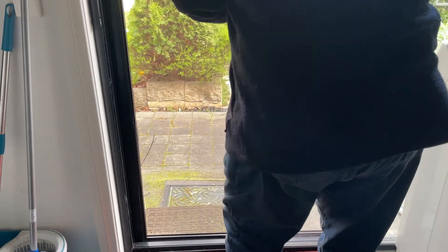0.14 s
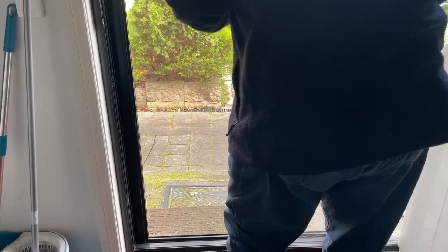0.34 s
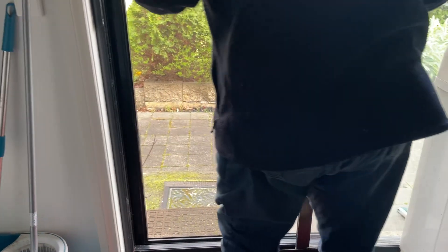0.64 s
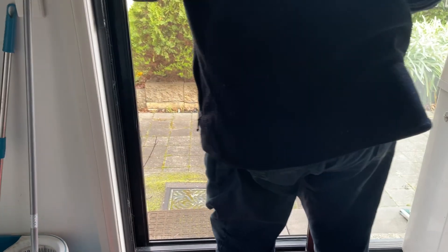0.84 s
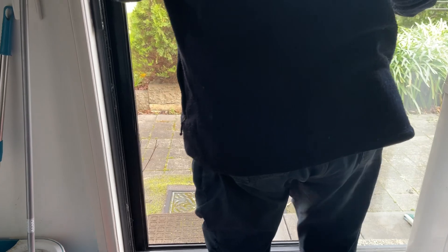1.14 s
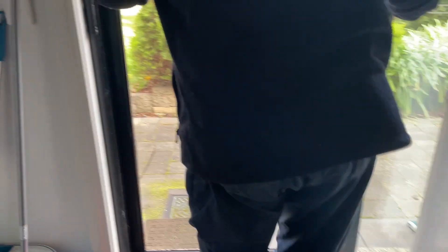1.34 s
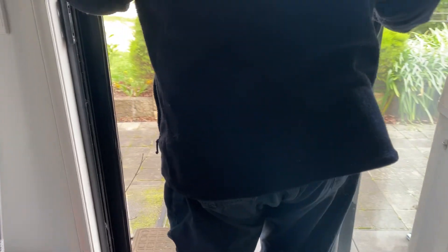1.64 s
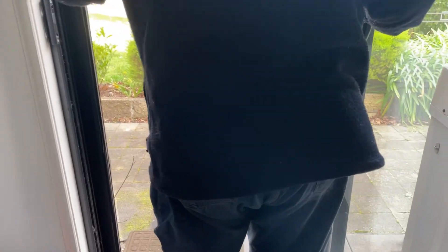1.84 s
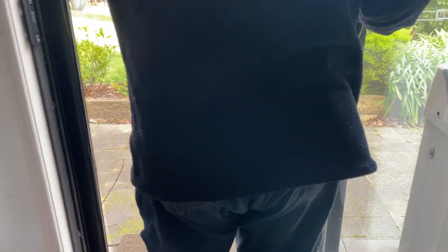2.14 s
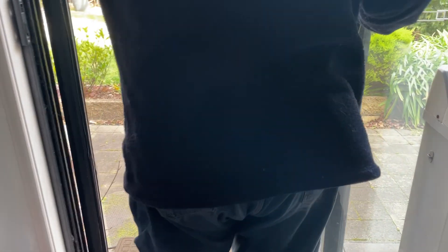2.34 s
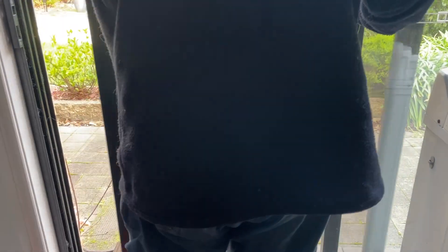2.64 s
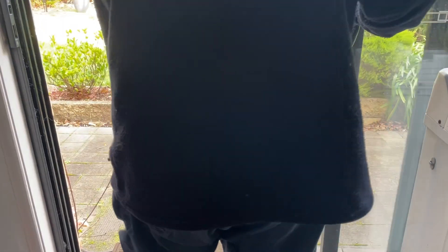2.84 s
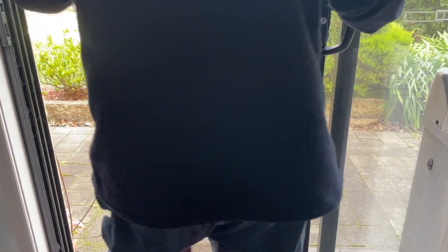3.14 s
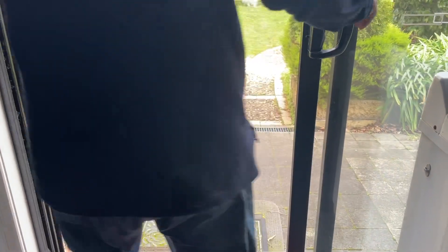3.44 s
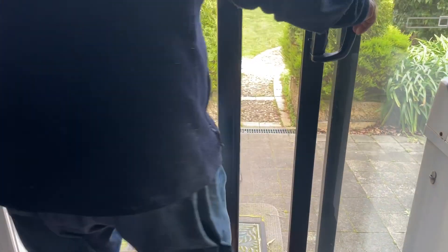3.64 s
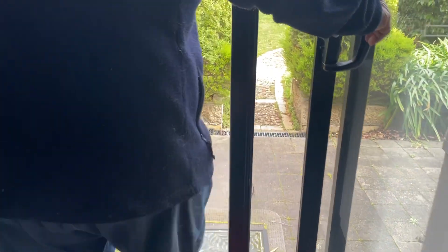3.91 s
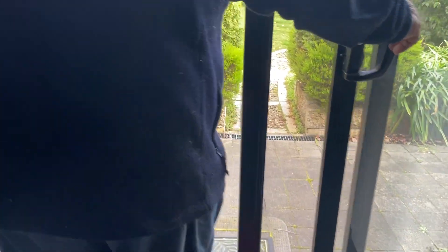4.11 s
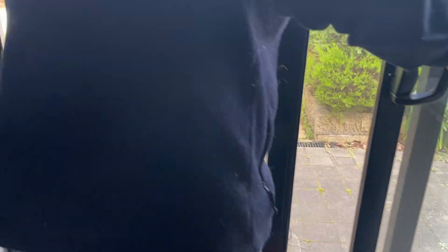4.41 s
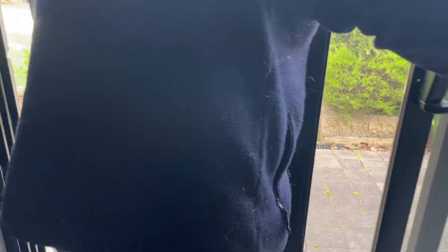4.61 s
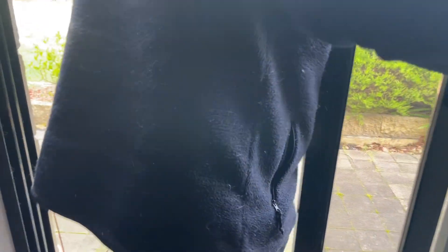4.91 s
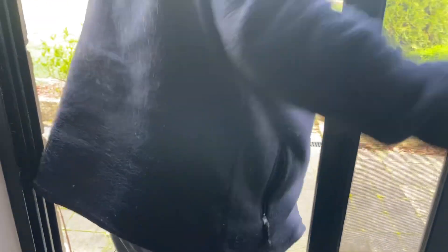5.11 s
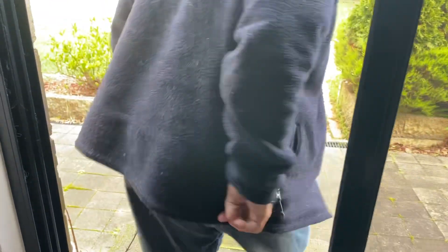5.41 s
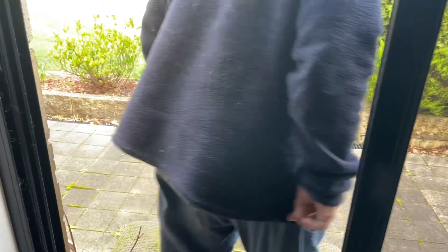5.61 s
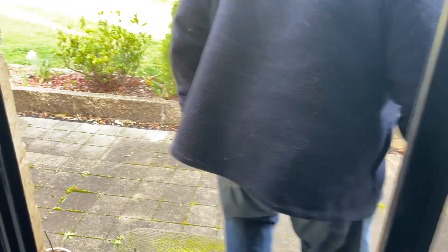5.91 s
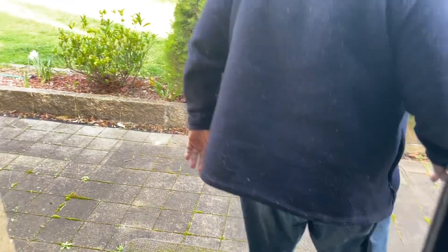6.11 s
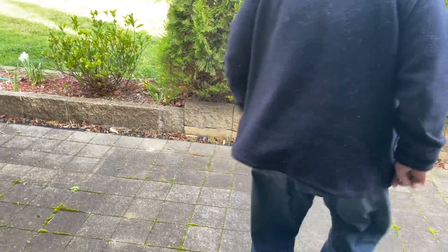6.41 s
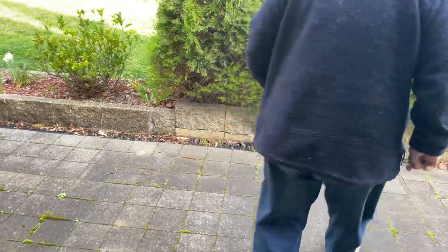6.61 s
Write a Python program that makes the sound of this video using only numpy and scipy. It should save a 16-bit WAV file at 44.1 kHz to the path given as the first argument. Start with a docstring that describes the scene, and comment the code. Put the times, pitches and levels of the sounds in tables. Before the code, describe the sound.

Heavy glass panels roll on a track: a first low rumble with clacks dies down, a brittle metallic clatter follows, then a stronger, longer rumble with scraping and rattling. After it stops, a person steps out, soles scuffing softly, heels striking the sill very sharply, then the doorstep and paving. Stereo phone pickup, short indoor reverberation thinning towards a quiet outdoor hiss.

```python
"""Small room at a garden doorway: two sliding glass doors a metre from a phone's two microphone ports.
Rollers bump and scrape along the tracks, as random grains ringing floor, panes, frame and rail.
Latch and frame clack as dying bursts; metal parts ping as wavering sines; a seal whines in narrow noise.
Then someone steps out: soles scuff as filtered hiss, heels ring sill, doorstep and paving as decaying modes.
House rumble and garden hiss are shaped noise; an octave-band noise tail answers for the room."""
import sys
import numpy as np
from scipy import signal
from scipy.fft import rfft, irfft, next_fast_len
from scipy.io import wavfile
from scipy.ndimage import uniform_filter1d

SR = 44100
rng = np.random.default_rng(int(sys.argv[2]) if len(sys.argv) > 2 else 0)


def master_out(mix):
    """Clip the mix to full scale and print it as 16-bit PCM to the path in sys.argv[1]."""
    frames = np.transpose(np.atleast_2d(mix))
    ceiling = np.clip(frames, -1, 1)
    pcm = np.round(ceiling * 32767).astype(np.int16)
    wavfile.write(sys.argv[1], SR, pcm)


N = 298116
T = np.arange(N) / SR
SIZE = next_fast_len(N + SR // 2)
HZ = np.maximum(np.arange(SIZE // 2 + 1) * SR / SIZE, 1)

# air spectrum, relative: [f/Hz, level/dB per Hz]
AIR_SPECTRUM = [(20, -23), (37, -7), (62, 3), (140, -2), (240, -6.5), (320, -12.5), (700, -16.5),
                (1200, -23.5), (1900, -27), (3000, -30), (5000, -48.5), (8500, -49.5), (10500, -57),
                (12500, -57), (16000, -68)]
# air over time: [t/s, house rumble level/dB, garden hiss level/dB]
AIR_LEVELS = [(0, -32.5, -91), (1.3, -56.5, -69), (1.75, -50, -66), (4.2, -56.5, -68), (4.46, -57.5, -68.5),
              (5.1, -53, -66.5), (5.7, -56, -64.5), (5.98, -52.5, -63), (6.35, -57.5, -66.5),
              (6.76, -50.5, -61.5)]
FLICKER_DB = 2.5  # depth scale of the slow walk in air and grit levels

# doors roll, shake and settle: [t/s, pane rumble level/dB, track grit level/dB above the rumble]
ROLL_LEVELS = [(0.0, -25.5, -26), (0.17, -31.5, -30), (0.3, -36.5, -24), (0.54, -38.5, -25.5),
               (0.62, -42.5, -21), (0.82, -45, -22.5), (1.0, -67, -3), (1.26, -52, -16.5),
               (1.42, -60.5, -11.5), (1.48, -38.5, -34), (1.603, -39, -9), (1.8, -51.5, -61),
               (1.9, -72, -4), (2.0, -53, -37), (2.131, -71, -12), (2.158, -36, -20), (2.35, -42.5, -15.5),
               (2.42, -32, -21), (2.6, -29, -21.5), (2.72, -31, -19.5), (2.83, -35.5, -11.5),
               (2.88, -28, -24.5), (2.98, -29, -23), (3.2, -34.5, -11), (3.45, -35, -17),
               (3.6, -43.5, -13.5), (3.75, -53, -17), (3.9, -54, -18), (3.98, -48, -12.5), (4.13, -57, -48),
               (4.2, -88, -38)]
# the two doors: [rolls until t/s, floor boom and frame drone level/dB above the rumble at median drive,
# then rail scrape, bright top and seal hiss level/dB above the grit]
DOORS = [(2.12, -7.5, -6, -0.75, -7, 3.5), (4.2, -4.5, -6, 1.8, -15.5, -1.5)]
# modes of each door's pane: [f/Hz, width f/Hz, level/dB]
PANE_MODES = [
    [(103, 24, -6.5), (162, 29, 1), (207, 12, 0.5), (235, 24, 0), (288.6, 27, -1.5), (342, 14.6, -4),
     (410, 62, -6.5), (549, 10.4, -8.5), (669, 31, -13.5)],
    [(83.3, 20.4, -1.5), (135.5, 41, 1), (170.8, 24, -2), (201.3, 34, -1.5), (252.5, 54, -5.5),
     (364, 58, -12), (457, 40, -7.5)],
]
# floor boom: [f/Hz, width f/Hz, level/dB]
FLOOR_MODES = [(36, 33, -36), (61.5, 3.3, 15)]
# door frame: [f/Hz, width f/Hz, level/dB]
FRAME_MODES = [(347, 104, 3.5), (450, 98, 3), (540.5, 30, 2.5), (636, 132, -4), (784, 186, -5.5),
               (872, 187, -8)]
# rail: [f/Hz, width f/Hz, level/dB]
RAIL_MODES = [(940, 300, 8), (1181, 46, 11), (1320, 50, 10), (1594, 310, 12), (2370, 220, -3)]
# track: [f/Hz, width f/Hz, level/dB]
TRACK_MODES = [(2300, 500, -3), (2850, 450, -2), (3420, 280, 4), (4250, 600, -3), (5300, 1400, -8)]
# broad hiss of the brush seal: [f/Hz, width f/Hz, level/dB]
SEAL_HISS = [(1050, 410, 0.5), (2380, 1900, -3), (4270, 1600, -6.5)]
BUMPS_PER_S, GRIT_PER_S = 500, 3000
FLOOR_PER_RUMBLE = -0.48  # dB of floor boom share per dB of rumble
FRAME_PER_GRIT = 0.26  # dB of frame drone per dB of grit
MODE_WANDER_DB, MODE_WANDERS_PER_S = 3.5, 12  # the pane favours now one mode, now another
PATCHY_DB, PATCHES_PER_S = 3, 45  # each scraped part catches and lets go by itself

# uneven spots jolt the pane: [t/s, level/dB before a fixed 3.5 dB lift, f/Hz, t60/s]
JOLTS = [(0.035, -22, 348, 0.15), (0.0, -37, 39.2, 0.31), (0.078, -28, 151.1, 0.46), (0.44, -40, 673, 0.37),
         (0.13, -28.5, 443, 0.1), (0.134, -48, 216, 0.098), (0.161, -28, 71.4, 0.32),
         (0.21, -31.5, 384.6, 0.22), (0.451, -29, 416, 0.073), (0.49, -26.5, 241, 0.22),
         (1.575, -27.5, 75.7, 0.17), (2.229, -29.5, 236.5, 0.14), (2.409, -35, 84.5, 0.22),
         (2.481, -25, 145, 0.17), (2.55, -23, 189, 0.18), (2.58, -25, 135.4, 0.34), (2.649, -30, 87, 0.23),
         (2.86, -30.5, 90, 0.23), (2.863, -25, 234, 0.11), (2.961, -30.5, 91.7, 0.4),
         (3.041, -37, 137, 0.12), (3.2, -34, 87, 0.35), (3.31, -31.5, 89.7, 0.31),
         (1.618, -29.5, 130, 0.27), (3.15, -25.5, 445.4, 0.33), (3.202, -23, 182, 0.1),
         (3.297, -27, 307, 0.025)]
JOLT_RISE_SHARE = 0.042  # rise time over t60

# latch and frame clacks: [t/s, track level/dB, then level/dB above it of rail, bright top and dull body,
# t60/s of the metal]
CLACKS = [(0.06, -34.5, -40, 0, 6, 0.062), (0.098, -40, 7.5, -25, 9, 0.098),
          (0.126, -45.5, 5.5, -35, 14.5, 0.22), (0.271, -50, -24.5, -6, 17, 0.18),
          (0.305, -37.5, 3.5, -45, 0.5, 0.16), (1.2816, -52, 0.5, -36, 9, 0.094),
          (1.294, -52.5, 6.5, -32, -0.5, 0.14), (1.4394, -43, 6, -2.5, -5, 0.12),
          (1.455, -46, -15, -12, 2, 0.075), (1.473, -34.5, -3, -7, -11, 0.11),
          (1.491, -47.5, 6, -27, 0, 0.1), (1.562, -38.5, -8, 4.5, -11, 0.073),
          (1.566, -35, 1.5, -1, -3.5, 0.13), (1.623, -47.5, 5.5, -21, 7, 0.14),
          (1.847, -44, 0, -45, -20, 0.15), (1.9478, -54, 5, -36, 3, 0.13),
          (2.0543, -41.5, -1, -7, -10, 0.13), (2.24, -44.5, 6, -30, 11, 0.041),
          (2.313, -59.5, 14.5, 8.5, 16.5, 0.5), (2.46, -44, 3.5, -36, 4.5, 0.11),
          (2.471, -43, 9, -45, 5, 0.2), (2.5716, -40, -27, -39, -24, 0.17),
          (2.5938, -38.5, 10, -35, 6.5, 0.09), (2.611, -36, 6.5, -30, 4, 0.2),
          (2.705, -38.5, 5, -32, -15, 0.19), (2.757, -41, -9, -11, -24, 0.21),
          (2.966, -42.5, 0, -11, 4.5, 0.44), (3.027, -40.5, 0.5, -32, -4, 0.2),
          (3.162, -34, -29, -33, -3, 0.21), (3.297, -36.5, -11, -37.5, -2.5, 0.18),
          (3.36, -50, -16, -33, 13.5, 0.14)]
CLACK_RISE_SHARE, CLACK_PAN_DB = 0.049, 4.5  # rise time over t60; left minus right

# small metal parts ping: [t/s, level/dB, f/Hz, t60/s]
PINGS = [(0.311, -36, 2810, 0.16), (0.315, -45, 1500, 0.13), (1.282, -45, 1940, 0.055),
         (1.442, -39.5, 1755, 0.31), (1.442, -41, 1910, 0.24), (2.713, -40, 1500, 0.076),
         (2.619, -33, 1248, 0.12), (1.453, -40, 2720, 0.056), (1.568, -26, 4240, 0.025),
         (1.566, -32.5, 1610, 0.048), (1.576, -30.5, 3280, 0.035), (1.624, -48, 3320, 0.1),
         (1.682, -51.5, 3290, 0.095), (1.854, -43.5, 951, 0.25), (1.946, -54.5, 5720, 0.17),
         (2.144, -41.5, 2157, 0.078)]
# a roller hits a dent in the track: [t/s, level/dB]
ROLLER_HITS = [(2.571, -31.5), (2.967, -29.5), (3.012, -32), (3.04, -32), (3.093, -30.5), (3.302, -30),
               (3.366, -30.5), (3.385, -32), (3.475, -36), (3.591, -40)]
# small cracks and taps under the soles: [t/s, level/dB, f/Hz, bright top level/dB above the pitch]
CRACKS = [(3.836, -45, 3180, -5), (4.591, -46, 667, -58), (5.536, -51, 1930, -7), (5.699, -54, 730, -33),
          (5.989, -52, 760, -45), (6.015, -48, 760, -48), (6.102, -51, 4700, -19), (6.118, -53, 1400, -40),
          (6.141, -36, 1660, -42), (6.142, -40, 3200, -31), (6.144, -33.5, 1700, -42),
          (6.165, -53, 2530, -7), (6.243, -57, 3850, -22), (6.552, -47, 3430, -16),
          (6.662, -39, 3460, -11.5), (6.739, -50, 2390, -17)]
ROLLER_HZ, ROLLER_SPREAD_HZ, ROLLER_T60_S = 3430, 107, 0.016
CRACK_T60_S = 0.026  # at 1 kHz; higher cracks die sooner, by the root of the pitch

# seal whine, each band filtered twice: [f/Hz, width f/Hz per pass, level/dB of the first pass]
WHINE_BANDS = [(1260, 80, 0), (4620, 220, -11), (6600, 260, -15), (7700, 260, -13)]
# seal whine over time, silent outside: [t/s, level/dB]
WHINE_LEVELS = [(3.5, -66), (3.63, -65.5), (3.79, -63), (3.83, -64), (3.9, -67)]

# soles and cloth dragging: [t/s, hiss level/dB before the drag envelope, dull rub level/dB above it,
# bright top level/dB above it, length scale/s]
SCUFFS = [(3.902, -51, 0.5, 3, 0.12), (4.448, -76.5, 22.4, 6, 0.1), (4.66, -55.5, 0.94, -7, 0.15),
          (4.727, -63, 15.5, 3.5, 0.15), (5.026, -37, 1.1, -23, 0.16), (6.09, -53, 4.5, -20, 0.17),
          (6.524, -53.5, 0.75, 7.5, 0.09), (6.6, -70, 17, -14, 0.19), (6.68, -69, 14, -12, 0.25)]

# footfalls: [t/s, what is trodden on, knock level/dB, contact time/s, left minus right level/dB]
STEPS = [(3.978, "ground", -37, 0.0035, 3), (4.619, "ground", -38, 0.0054, 2),
         (4.808, "ground", -43, 0.0068, 0), (5.05, "sill", -25, 0.00072, 6),
         (5.0642, "sill", -13, 0.00018, 5), (5.068, "sill", -16, 0.0012, 0),
         (5.0721, "sill", -18, 0.00043, -0.5), (5.092, "sill", -31.5, 0.00084, -2),
         (5.543, "ground", -35, 0.0039, 2), (5.7696, "doorstep", -15, 0.00053, 3.5),
         (6.079, "ground", -24.5, 0.0011, 1), (6.103, "ground", -28, 0.0009, 0),
         (6.113, "ground", -35, 0.00077, 3), (6.15, "ground", -34, 0.0084, 4),
         (6.222, "ground", -41.5, 0.0012, 2)]
# sill modes: [f/Hz, level/dB, t60/s]
SILL_MODES = [(125, -4, 0.071), (171.3, -3, 0.15), (261, 4.5, 0.042), (332, 1.5, 0.046), (433, 1, 0.11),
              (521, -6, 0.13), (637, 2, 0.027), (816, 1, 0.049), (1020, -1, 0.046), (1120, -6, 0.06),
              (1194, -0.5, 0.074), (1304, 2.5, 0.062), (1596, -3, 0.054), (2054, 0.5, 0.026),
              (2200, -13, 0.041), (2560, -4, 0.019), (3020, -15, 0.038), (3330, -14, 0.04)]
# doorstep modes: [f/Hz, level/dB, t60/s]
DOORSTEP_MODES = [(195, -5.5, 0.11), (244, 0.5, 0.048), (301, -2.5, 0.12), (383, -4.5, 0.098),
                  (490, -1.5, 0.061), (759, -7, 0.069), (888, -13, 0.052), (1070, -5, 0.041),
                  (1145, -2, 0.065), (1196, -10, 0.074), (1355, -16, 0.051), (1585, -13, 0.025),
                  (1780, -12.5, 0.051), (2980, -9.5, 0.041)]
# ground modes: [f/Hz, level/dB, t60/s]
GROUND_MODES = [(72, -8.5, 0.11), (128, -4, 0.062), (258, 6, 0.03), (362, 1, 0.049), (492, 5.5, 0.038)]
# what is trodden on keeps shaking after a blow: strength, and its time constant in s
SHUDDER, SHUDDER_S = {"sill": 0.014, "doorstep": 0.0039, "ground": 0.002}, 0.03
HEEL_CRACK_DB, HEEL_CRACK_S = -19, 0.0016  # dry crack against the ring; its time constant
BLOW_SCATTER_DB = 3.5  # every blow wakes the modes a little differently
RING_WAVER = 0.022  # radians a sample at 1 kHz: loose boards blur their own pitches

# room tail: [f/Hz, t60/s, level/dB against the sound sent into the room]
ROOM_TAIL = [(58.6, 0.56, 11), (258, 0.44, -3), (514, 0.23, 10), (900, 0.35, 10.5), (4100, 0.14, 9),
             (12600, 0.017, 3.5)]
# the room fades as the phone is carried out: [t/s, level/dB sent into the room]
INDOORS_LEVELS = [(5.0, -12.5), (5.8, -12.5), (6.1, -11.5), (6.76, -19)]
ROOM_SHIFT_S = 0.07  # time from one tail pattern to the next
DOORWAY_DB = 0  # feet and small contacts sent to the room, against the door

# likeness of diffuse sound at the two ports: [f/Hz, likeness 0-1]
PORT_LIKENESS = [(40, 0.82), (200, 0.99), (600, 0), (2500, 0.52), (5000, 0), (8000, 0.42), (11000, 0.3),
                 (12500, 0.4), (14000, 1)]
# phase between the ports: [f/Hz, left port's lead/radians]
PORT_LEAD = [(100, 0), (300, .3), (700, .7), (1500, -.8), (3000, .9), (5000, 0), (6500, -2.4), (7500, -3.3),
             (8500, -3.7), (9500, -5.3), (10500, -6.2), (11500, -6.4), (12500, -7.6), (13500, -9),
             (14300, -9.4)]
# level between the ports: [f/Hz, left minus right level/dB]
PORT_BALANCE = [(60, -5), (110, -4), (200, -4), (360, -4), (650, 3), (1180, 1), (2140, -0.5), (3890, 2.5),
                (7060, 0), (12800, -1.5)]
# treble falls by SHELF_DB above SHELF_HZ; nothing is left above TOP_HZ
SHELF_HZ, SHELF_DB, TOP_HZ = 13350, -8, 15850


def undb(db):
    """Turn decibels into an amplitude factor."""
    return 10 ** (np.asarray(db) / 20)


def unit(x):
    """Scale to rms 1."""
    return x / np.sqrt(np.mean(x ** 2))


def over_hz(table):
    """Read a (f/Hz, value) table at every frequency bin, along log frequency."""
    hz, value = np.transpose(table)
    return np.interp(np.log(HZ), np.log(np.maximum(hz, 1)), value)


def shape(x, gain):
    """Filter by a gain per frequency bin."""
    return irfft(rfft(x, SIZE) * gain, SIZE)[..., :N]


def resonate(x, body):
    """Sum (f/Hz, width/Hz, level/dB) resonances, neighbours in opposite sign; rms 1."""
    response = 0
    for k, (hz, width, db) in enumerate(body):
        response = response + (-1) ** k * undb(db) / (1 + 1j * (HZ - hz ** 2 / HZ) / width)
    return unit(shape(x, response))


def grains(per_s, spread_db):
    """Scatter random tiny impacts, a few of them much larger."""
    hits = rng.random(N) < per_s / SR
    return hits * rng.standard_normal(N) * undb(spread_db * rng.exponential(size=N))


def walk(rate):
    """Hold random levels for 1 / rate s and smooth them twice."""
    k = int(SR / rate)
    held = np.repeat(rng.standard_normal(N // k + 1), k)
    return uniform_filter1d(uniform_filter1d(held, k), k)[:N]


def pan(db):
    """Split a left-minus-right level evenly between the channels."""
    return undb(np.array([[db], [-db]]) / 2)


def diffuse(mid, side):
    """Mix two signals to the likeness that each pitch has at the two ports."""
    like = np.clip(over_hz(PORT_LIKENESS), 0, 1)
    common = shape(mid, np.sqrt((1 + like) / 2))
    opposed = shape(side, np.sqrt((1 - like) / 2))
    return common + opposed * np.array([[1], [-1]])


def air():
    """House rumble below, garden hiss above: shaped noise that swells slowly and flickers."""
    s, low_db, hiss_db = np.transpose(AIR_LEVELS)
    low = 1 / (1 + (HZ / 500) ** 2)
    out = 0
    for share, db, lo_hz, hi_hz in ((low, low_db, 40, 300), (1 - low, hiss_db, 1000, 6000)):
        gain = undb(over_hz(AIR_SPECTRUM)) * np.sqrt(share)
        # rms 1 in the band that sets the level
        in_band = (HZ > lo_hz) & (HZ < hi_hz)
        gain /= np.sqrt(2 * np.sum(gain[in_band] ** 2) / SIZE)
        noise = diffuse(*shape(rng.standard_normal((2, N)), gain))
        out = out + noise * undb(np.interp(T, s, db) + FLICKER_DB * walk(11))
    return out


def bright():
    """The top of scraping and clacking: dense grains in high resonances."""
    body = [(6520, 1010, -2.0), (9260, 1800, -7.0), (11170, 1800, -9.5), (15000, 1100, -13.0)]
    return resonate(grains(5600, 0.72), body)


def pane_rumble(bumps, modes):
    """Bumps ring each pane mode, whose strength wanders by itself."""
    out = 0
    for k, (hz, width, db) in enumerate(modes):
        level = undb(db + MODE_WANDER_DB * walk(MODE_WANDERS_PER_S))
        out = out + (-1) ** k * level * resonate(bumps, [(hz, width, 0)])
    return unit(out)


def patchy_scrape(grit, body):
    """Grit scrapes each resonance in patches of its own."""
    out = 0
    for hz, width, db in body:
        level = undb(db + PATCHY_DB * walk(PATCHES_PER_S))
        out = out + level * resonate(grit, [(hz, width, 0)])
    return unit(out)


def rolling(top):
    """Rollers bump along the track: bumps shake floor, pane and frame, grit scrapes rail and track."""
    bumps = grains(BUMPS_PER_S, 0.5)
    floor = resonate(bumps, FLOOR_MODES)
    frame = resonate(bumps + grains(BUMPS_PER_S, 0.83), FRAME_MODES)
    first_pane, second_pane = [pane_rumble(bumps, modes) for modes in PANE_MODES]

    grit = grains(GRIT_PER_S, 1.6) * undb(FLICKER_DB * walk(30))
    grit = shape(grit, 1 / (1 + (HZ / 7000) ** 4))
    grit = diffuse(grit, np.roll(grit, N // 3))  # the scrape runs the whole width of the doorway
    rail = patchy_scrape(grit, RAIL_MODES[::3]) + resonate(grit, RAIL_MODES[1:3]) / 2
    track = patchy_scrape(grit, TRACK_MODES)
    seal = resonate(grains(GRIT_PER_S, 2.0) * undb(4 * walk(20)), SEAL_HISS)

    s, *columns = np.transpose(ROLL_LEVELS)
    pane_db, grit_db = (np.interp(T, s, c) for c in columns)
    until, *door_db = np.transpose(DOORS)
    second = T > until[0]
    pane = np.where(second, second_pane, first_pane)
    floor_db, frame_db, rail_db, top_db, seal_db = (c[second.astype(int)] for c in door_db)
    floor_db = floor_db + FLOOR_PER_RUMBLE * (pane_db - np.median(columns[0]))
    frame_db = frame_db + FRAME_PER_GRIT * (grit_db - np.median(columns[1]))

    scrape = track + undb(rail_db) * rail + undb(top_db) * top + undb(seal_db) * seal
    shaken = pane + undb(floor_db) * floor + undb(frame_db) * frame
    return (T < until[-1]) * undb(pane_db) * (shaken + undb(grit_db) * scrape)


def jolts():
    """Each jolt swells one pane mode, which wavers in pitch and dies away."""
    age, out = np.arange(SR // 2) / SR, np.zeros(N + SR)
    for (s, db, hz, t60), waver in zip(JOLTS, rng.standard_normal((len(JOLTS), len(age)))):
        ring = np.sin(2 * np.pi * hz * age + 0.018 * np.cumsum(waver))
        rise = 1 - np.exp(-age / (JOLT_RISE_SHARE * t60))
        out[int(s * SR):][:len(age)] += rise * undb(db + 3.5 - 60 * age / t60) * ring
    return out[:N]


def clacks(top):
    """Loose metal parts strike: a burst in rail, track and frame dies away, the top first."""
    rattle = grains(6000, 1.4) * undb(4 * walk(150))  # comes in clusters
    rail, track = resonate(rattle, RAIL_MODES), resonate(rattle, TRACK_MODES)
    body = resonate(rng.standard_normal(N), FRAME_MODES)
    out = np.zeros((2, N))
    for s, db, rail_db, top_db, body_db, t60 in CLACKS:
        part = slice(int(s * SR), int(s * SR) + SR // 2)
        age = T[part] - s
        rise = 1 - np.exp(-age.clip(0) / (CLACK_RISE_SHARE * t60))
        ring = undb(-60 * age / t60) * (track[part] + undb(rail_db) * rail[part])
        ring = ring + undb(top_db - 60 * age / (0.7 * t60)) * top[part]
        ring = ring + undb(body_db - 60 * age / (2 * t60)) * body[part]
        out[:, part] += pan(CLACK_PAN_DB) * rise * undb(db) * ring
    return out


def ticks(top):
    """Small hard contacts: wavering pings, short or long; some cracks have a bright edge."""
    age, out = np.arange(SR // 8) / SR, np.zeros(N + SR)
    rows = [(s, db, hz, 0, t60) for s, db, hz, t60 in PINGS]
    for s, db in ROLLER_HITS:
        hz = ROLLER_HZ + ROLLER_SPREAD_HZ * rng.standard_normal()
        rows.append((s, db, hz, 0, ROLLER_T60_S))
    for s, db, hz, top_db in CRACKS:
        rows.append((s, db, hz, undb(top_db), CRACK_T60_S * np.sqrt(1000 / hz)))
    for (s, db, hz, edge_gain, t60), waver in zip(rows, rng.standard_normal((len(rows), len(age)))):
        drift = 0.22 * np.cumsum(uniform_filter1d(waver, size=12))
        ping = np.sin(2 * np.pi * hz * age + drift)
        edge = np.take(top, int(s * SR) + np.arange(len(age)), mode="wrap")
        out[int(s * SR):][:len(age)] += undb(db - 60 * age / t60) * (ping + edge_gain * edge)
    return out[:N]


def whine():
    """Rubber dragging on the track sings faintly: noise passed twice through narrow bands."""
    once = resonate(rng.standard_normal(N), WHINE_BANDS)
    twice = resonate(once, [(hz, width, 0) for hz, width, _ in WHINE_BANDS])
    return twice * undb(np.interp(T, *np.transpose(WHINE_LEVELS), left=-200, right=-200))


def scuffs(top):
    """Short drags of a sole or sleeve: hiss that sets in fast and trails off."""
    dust = grains(8000, 0.71)
    rub = resonate(dust, [(1330, 910, 0.14), (1920, 920, -0.5)])
    hiss = resonate(dust, [(4560, 6100, 0)])
    hiss = unit(shape(hiss, 1 / (1 + (HZ / 7000) ** 4)))  # the hiss falls away steeply above this
    out = np.zeros(N)
    for s, db, rub_db, top_db, length in SCUFFS:
        knots = s + length * np.array([-0.04, 0.069, 0.28, 0.71])
        drag = np.interp(T, knots, [0.005, 0.35, 0.18, 0.0089])
        out += drag * undb(db) * (hiss + undb(rub_db) * rub + undb(top_db) * top)
    return out


def struck_modes(modes, age):
    """A struck surface rings in decaying modes of scattered strength and wavering pitch."""
    out = 0
    for k, (hz, db, t60) in enumerate(modes):
        level = undb(db + BLOW_SCATTER_DB * rng.standard_normal() - 60 * age / t60)
        waver = RING_WAVER * np.sqrt(hz / 1000) * np.cumsum(rng.standard_normal(len(age)))
        out = out + (-1) ** k * level * np.sin(2 * np.pi * hz * age + waver)
    return out


def footfalls():
    """Each heel pushes, cracks and rattles on what it treads; a longer push favours the low modes."""
    age = np.arange(SR // 3) / SR
    rattle_age = age[:SR // 6]
    out = np.zeros((2, N + SR))
    modes = {"sill": SILL_MODES, "doorstep": DOORSTEP_MODES, "ground": GROUND_MODES}
    rattles = rng.standard_normal((len(STEPS), SR // 6))
    for (s, underfoot, db, contact, pan_db), rattle in zip(STEPS, rattles):
        blow = 0.032 * rattle * np.exp(-rattle_age / 0.0046)
        blow += SHUDDER[underfoot] * rattle[::-1] * np.exp(-rattle_age / SHUDDER_S)
        blow[0] = 1
        contact_samples = int(max(contact, 0) * SR)
        push = np.convolve(blow, np.hanning(contact_samples + 3))
        knock = signal.fftconvolve(struck_modes(modes[underfoot], age), push)[:len(age)]
        knock = knock / np.abs(knock).max()
        burst = rattle * np.exp(-rattle_age / HEEL_CRACK_S)
        crack = np.diff(np.convolve(burst, np.hanning(contact_samples + 22)))
        knock[:len(crack)] += undb(HEEL_CRACK_DB) * crack / np.abs(crack).max()
        out[:, int(s * SR):][:, :len(age)] += pan(pan_db) * undb(db) * knock
    return out[:, :N]


def room(dry):
    """A dense tail, shorter in the treble, cross-fades steadily between six noise patterns."""
    age, tails, places = np.arange(SR // 2) / SR, 0, 6
    log_hz = np.log(np.array(ROOM_TAIL)[:, 0])
    for hz in 45 * 2. ** np.arange(9):
        t60, db = (np.interp(np.log(hz), log_hz, c) for c in np.transpose(ROOM_TAIL)[1:])
        edges = [hz / np.sqrt(2), hz * np.sqrt(2)]
        octave = signal.butter(2, edges, "band", fs=SR, output="sos")
        band = signal.sosfilt(octave, rng.standard_normal((places, 2, len(age))))
        tail = band * undb(-60 * age / t60) * (age > 0.002)
        share = np.sqrt(2) * hz / SR  # of the whole spectrum that this octave covers
        energy = np.sum(tail ** 2, axis=-1, keepdims=True)
        tails = tails + undb(db) * tail * np.sqrt(share / energy)
    wet = 0
    for k in range(places):
        away = (T / ROOM_SHIFT_S - k + places / 2) % places - places / 2  # steps from pattern k
        sent = dry * np.cos(np.pi / 2 * away.clip(-1, 1))
        wet = wet + rfft(sent, SIZE) * rfft(tails[k], SIZE)
    return diffuse(*irfft(wet, SIZE)[:, :N])


def scene():
    """Door and feet near the phone, the room around them, the air behind."""
    background = air()
    top = bright()
    door = rolling(top) + jolts() + clacks(top) + whine()
    small = ticks(top)
    feet = scuffs(top) + footfalls()
    indoors = undb(np.interp(T, *np.transpose(INDOORS_LEVELS)))
    sent = np.mean(door + undb(DOORWAY_DB) * (feet + small), axis=0) * indoors
    return door + feet + small + room(sent) + background


def record(dry):
    """The two microphone ports differ in level and phase over frequency; the top is cut."""
    ports = undb(over_hz(PORT_BALANCE) / 2) * np.exp(0.5j * over_hz(PORT_LEAD))
    dry = shape(dry, np.where(HZ > SHELF_HZ, undb(SHELF_DB), 1))
    stereo = shape(dry, np.array([ports, 1 / ports]))
    return signal.sosfilt(signal.ellip(8, 0.2, 60, TOP_HZ, fs=SR, output="sos"), stereo)


dry = scene()
out = record(dry)
master_out(out)
```